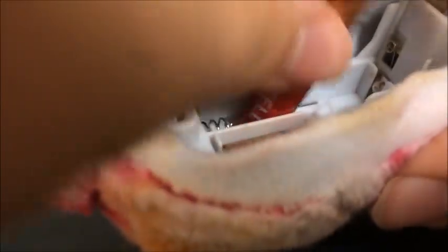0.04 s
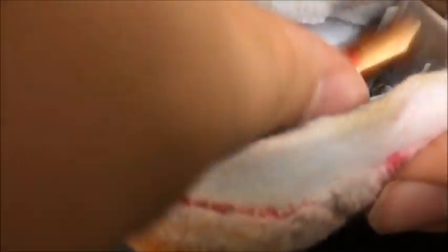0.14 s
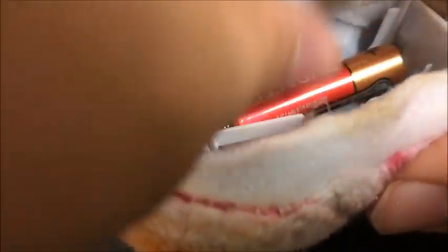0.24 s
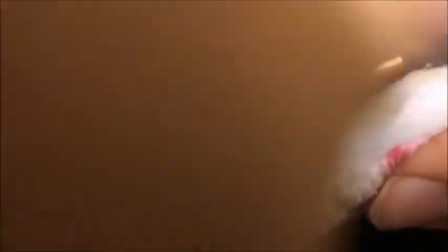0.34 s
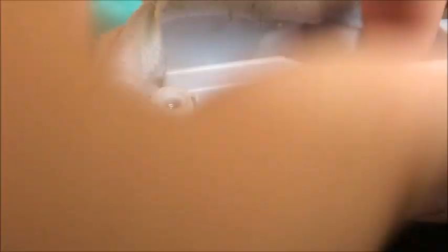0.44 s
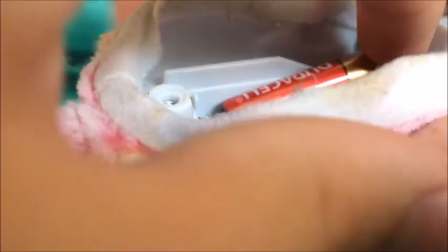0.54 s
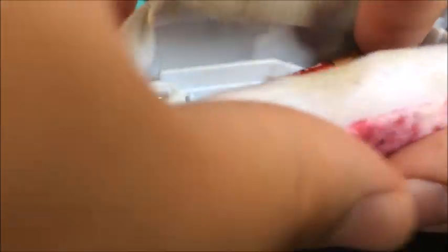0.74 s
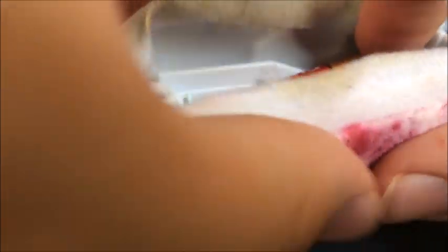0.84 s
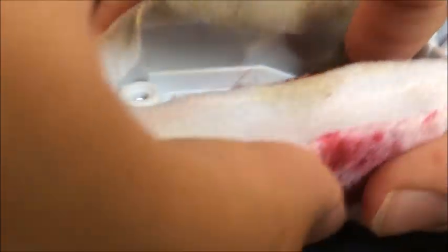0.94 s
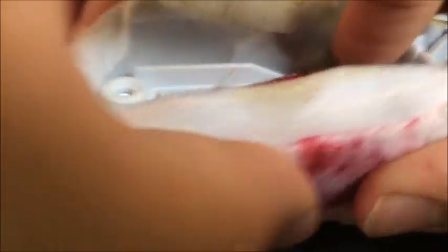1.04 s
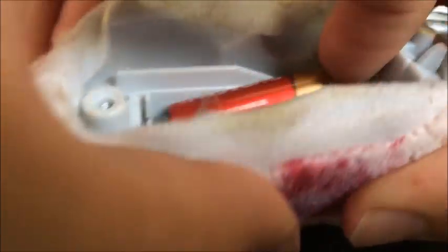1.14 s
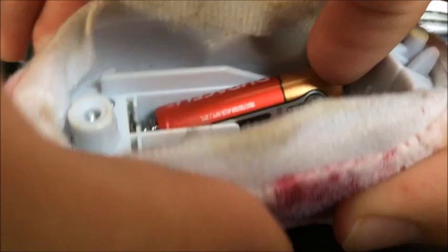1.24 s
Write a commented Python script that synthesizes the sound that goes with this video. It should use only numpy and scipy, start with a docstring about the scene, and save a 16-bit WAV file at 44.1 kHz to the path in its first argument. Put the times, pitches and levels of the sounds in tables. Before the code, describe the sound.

Light, close battery clicks against a soft toy's plastic compartment, with soft finger handling.

```python
"""Light, close ticks: a small battery knocks against the plastic compartment of a soft toy.
It slides over the contact spring, snaps home and rattles in its bay, each hit ringing the damped shell.
Then fingers bump the toy with soft thumps, brush its fabric in a grainy hiss and give one last
bright click with a few faint ticks after it. Underneath lies the low hush of a quiet room."""
import sys
import numpy as np
from scipy import signal
from scipy.fft import rfft, irfft, next_fast_len
from scipy.io import wavfile
from scipy.ndimage import map_coordinates

SR = 44100
rng = np.random.default_rng(int(sys.argv[2]) if len(sys.argv) > 2 else 0)


def output_pcm(signal):
    """Save a mono or channel-first signal as 16-bit PCM at the path in sys.argv[1].

    Samples are clipped to [-1, 1] before scaling.
    """
    pcm = np.clip(np.atleast_2d(signal).T, -1, 1) * 32767
    wavfile.write(sys.argv[1], SR, np.round(pcm).astype(np.int16))


N = 57330


def amp(db):
    """Decibels to gain."""
    return 10 ** (np.asarray(db) / 20)


def unit_rms(x):
    """Scale to rms 1."""
    return x / np.sqrt(np.mean(x ** 2) + 1e-20)


def curve_at(points, hz):
    """Read (frequency, value) points along a log frequency axis."""
    freqs, values = np.transpose(points)
    return np.interp(np.log(hz + 1), np.log(freqs + 1), values)


def equalise(x, gain_at):
    """Zero-phase EQ from a function that gives the gain at each frequency."""
    size = next_fast_len(len(x) + SR // 4)
    return irfft(rfft(x, size) * gain_at(np.fft.rfftfreq(size, 1 / SR)), size)[:len(x)]


def coloured_noise(spectrum):
    """Noise of rms 1, shaped by (frequency, level) points."""
    return unit_rms(equalise(rng.standard_normal(N), lambda hz: amp(curve_at(spectrum, hz))))


def wobble(per_s):
    """A smooth random curve with per_s knots a second."""
    knots = rng.standard_normal(int(N * per_s / SR) + 4)
    return map_coordinates(knots, [np.arange(N) * per_s / SR])


def place(track, start_s, sound):
    """Mix a sound into the track at its cue."""
    part = track[max(0, round(start_s * SR)):][:len(sound)]
    part += sound[:len(part)]


# Tone colour of the quiet room: (frequency [Hz], relative level [dB])
HUSH_SPECTRUM = [(15, -43.5), (30, -27.5), (60, -4), (90, 1.5), (170, 0.5), (280, -11.5), (450, -17.5),
                 (1400, -24), (4250, -28.5), (16000, -32.5)]

def room_hush(level_db=-61):
    """A steady, bass-heavy bed of room tone."""
    return amp(level_db) * coloured_noise(HUSH_SPECTRUM)


# Decay of the room's reflections: (frequency [Hz], t60 [s])
ROOM_DECAY = [(200, .2), (1000, 0.36), (4000, .14), (12000, 0.39)]

def room_reflections(x, wet_db=-27.5, predelay_s=.004):
    """The table and walls answer with a short, weak tail."""
    hz, t, spectrogram = signal.stft(rng.standard_normal(SR // 3), SR, nperseg=256)
    decay = amp(-60 * t / curve_at(ROOM_DECAY, hz)[:, None])
    tail = signal.istft(spectrogram * decay, SR, nperseg=256)[1]
    out = np.zeros(N)
    place(out, predelay_s, signal.fftconvolve(x, tail / np.linalg.norm(tail)))
    return amp(wet_db) * out


# Swells of the handling rumble: (time [s], level [dB])
RUMBLE_ENVELOPE = [(0, -70.5), (.3, -49.5), (.42, -65.5), (.5, -60), (.82, -65.5), (.9, -56.5), (1.0, -59),
                   (1.12, -69), (1.3, -78)]
# Its dark tone colour: (frequency [Hz], relative level [dB])
RUMBLE_COLOUR = [(25, -26), (70, 0), (95, -3.5), (170, 0.5), (260, -12.5), (600, -45.5)]

def handling_rumble():
    """The toy rumbles softly as it shifts in the hand."""
    times, level_db = np.transpose(RUMBLE_ENVELOPE)
    envelope = amp(np.interp(np.arange(N) / SR, times, level_db))
    return envelope * coloured_noise(RUMBLE_COLOUR + [(2000, -120)])


# Strokes of battery, fingers and fabric: (time [s], hiss level [dB], scuff level [dB])
RUB_ENVELOPES = [(0, -59.5, -52.5), (.055, -64.5, -61.5), (.084, -73, -65.5), (0.099, -62, -59),
                 (.16, -59.5, -59.5), (0.227, -66, -86), (.247, -36, -61), (0.266, -55.5, -61),
                 (.31, -43.5, -38.5), (.365, -69, -64.5), (.44, -69, -80), (.485, -58.5, -55),
                 (.52, -70.5, -74), (.562, -69.5, -85), (0.579, -60, -57), (0.599, -80.5, -76),
                 (.765, -66.5, -70.5), (.82, -68.5, -67.5), (0.878, -60.5, -67.5), (.97, -67.5, -64),
                 (1.035, -50.5, -59.5), (1.106, -62.5, -62), (1.134, -49, -65), (1.164, -53.5, -72),
                 (1.2, -58.5, -64.5), (1.25, -54, -64.5), (1.3, -58.5, -68)]
# Bright layer of the friction: (frequency [Hz], relative level [dB])
HISS_SPECTRUM = [(500, -25.5), (1500, -5), (2800, 0.5), (4500, 0.5), (7000, -5), (10000, -10.5),
                 (16000, -23)]
# Dull layer of the friction: (frequency [Hz], relative level [dB])
SCUFF_SPECTRUM = [(100, -15.5), (220, -3), (650, 3.5), (1000, -3), (1900, -8.5), (3500, -20.5), (9000, -44)]

def rubbing(grain_db=2, swell_db=1.5):
    """Grainy friction under uneven finger pressure: a bright hiss over a duller scuff."""
    times, hiss_db, scuff_db = np.transpose(RUB_ENVELOPES)
    t = np.arange(N) / SR
    texture = unit_rms(amp(grain_db * wobble(per_s=500) + swell_db * wobble(per_s=35)))
    hiss = amp(np.interp(t, times, hiss_db)) * coloured_noise(HISS_SPECTRUM)
    scuff = amp(np.interp(t, times, scuff_db)) * coloured_noise(SCUFF_SPECTRUM)
    return texture * (hiss + scuff)


# Soft pushes of the hand: (time [s], pitch [Hz], level [dB], length [s])
HAND_PUSHES = [(.065, 280, -39, 0.01), (0.124, 91, -55, 0.023), (0.151, 225, -47, 0.032),
               (.236, 146, -42, 0.019), (.279, 198, -38, 0.015), (0.281, 90, -49.5, 0.023),
               (0.475, 140.4, -44, .02), (0.492, 93.6, -66, 0.029), (0.576, 70, -43, 0.044),
               (1.033, 87, -42, 0.029)]

def hand_thumps():
    """Each push rocks the toy for a few slow cycles."""
    out, t = np.zeros(N), np.arange(SR // 8) / SR
    for start_s, hz, level_db, length_s in HAND_PUSHES:
        arch = np.sin(np.pi * np.minimum(t / length_s, 1))
        place(out, start_s, amp(level_db) * arch * np.sin(2 * np.pi * hz * t))
    return out


# Brief pitched rings: (time [s], pitch [Hz], level [dB], t60 [s])
HIT_RINGS = [(0.1757, 1745, -22, .014), (.178, 962.5, -21, 0.02), (0.2403, 4310, -16.5, 0.012),
             (.2735, 1935, -1, 0.011), (0.2734, 5150, -6.5, 0.0086), (.2818, 591, -19, 0.027),
             (.4705, 862, -44, 0.073), (.574, 1686, -63, 0.22), (.6902, 631, -30, 0.018),
             (1.0263, 5270, -18, 0.0092)]

def hit_rings(attack_s=.0005):
    """Fast-decaying sines: the strongest tones of the loudest clicks, plus a few lone pings."""
    out, t = np.zeros(N), np.arange(SR // 5) / SR
    for start_s, hz, level_db, t60 in HIT_RINGS:
        envelope = amp(level_db - 60 * t / t60) * (1 - np.exp(-t / attack_s))
        place(out, start_s, envelope * np.sin(2 * np.pi * hz * t))
    return out


# Modes of the compartment with its battery: (frequency [Hz], relative level [dB], after-ring t60 [s])
COMPARTMENT_MODES = [(435, -6.5, .12), (625, 3, 0.4), (816, 1.5, .12), (915, -2.5, .15), (1130, -8, .09),
                     (1480, -3, 0.12), (1784, -3.5, .1), (1950, -6, 0.054), (2676, -4, .07),
                     (3155, -7.5, .06), (4360, -5.5, .14), (5350, -7.5, 0.063), (6750, -18.5, .09),
                     (8030, -13, .13)]
# The shell's five bands, from knock up to snap; the slow, low bending waves arrive last:
# (low edge [Hz], high edge [Hz], delay [s], attack [s], hold [s], t60 [s], noise against modes [dB])
SHELL_BANDS = [(260, 1150, .0008, .0009, 0.0007, 0.015, -2.5),
               (1150, 2300, 0.00018, 0.00094, 0.00073, 0.0079, -3),
               (2340, 3600, .0002, 0.00031, 0.0014, 0.0094, -3),
               (3880, 7500, .0001, .0003, 0.00062, 0.014, 4),
               (7900, 16000, 0.000086, 0.00012, .001, .011, 7)]
# Hits of battery on plastic, with a level for each band:
# (time [s], knock [dB], clack [dB], crack [dB], tick [dB], snap [dB])
BATTERY_HITS = [(.0094, -49.5, -47.5, -74.5, -60.5, -81), (.0182, -50.5, -52, -60, -62.5, -78),
                (.0275, -65.5, -53, -73, -77, -80.5), (.0644, -44, -38, -47.5, -41, -51),
                (.0695, -35.5, -45, -64, -54.5, -53), (.131, -48.5, -58, -74, -68, -66),
                (0.1413, -43.5, -54.5, -65.5, -66, -64), (.1763, -33, -43, -46, -43.5, -50),
                (.2077, -45.5, -39, -53, -50, -60.5), (.2105, -34, -42, -52, -54, -68),
                (.2313, -39.5, -34, -50, -41, -49.5), (.2402, -31.5, -26.5, -34, -34, -38.5),
                (.2422, -29.5, -24, -26, -33.5, -34), (.2555, -60, -50, -53.5, -47.5, -49),
                (.2583, -43.5, -33, -51.5, -47.5, -52.5), (.2733, -29.5, -26.5, -15.5, -25.5, -25.5),
                (.2797, -28, -27, -32, -30.5, -30.5), (.2852, -35.5, -27.5, -37, -33, -39),
                (.2905, -36.5, -54, -42.5, -38, -49), (.2941, -34.5, -27, -42.5, -34, -42),
                (.3043, -45, -36.5, -51, -40, -55), (.3165, -53, -45, -57, -48.5, -48),
                (.327, -47, -67, -56, -50, -58), (.3372, -39.5, -46.5, -51, -54, -64),
                (.353, -63, -59, -62, -55.5, -75), (.5272, -69, -60, -64.5, -61, -72),
                (0.5687, -58.5, -67, -73, -70, -65), (.6892, -50.5, -47.5, -58.5, -50.5, -83.5),
                (1.0205, -65, -52.5, -51.5, -50, -60), (1.0262, -55, -45, -46, -34.5, -45.5),
                (1.1255, -57, -70, -57, -47, -77), (1.1503, -60.5, -68, -78, -47.5, -61),
                (1.1672, -72, -72, -73, -49.5, -59)]

def battery_clicks(after_ring_db=-31.5, scatter_db=1.16, detune_share=.014, scatter_rad=.6):
    """Each hit chatters for an instant, rings the damped shell and leaves a faint after-ring."""
    out, t = np.zeros(N), np.arange(SR // 6) / SR
    level_window = .006 * SR  # a band's level is its rms with all its energy packed into 6 ms
    hz, mode_db, after_t60 = np.transpose(COMPARTMENT_MODES)
    after_decay = amp(-60 * t / after_t60[:, None])
    for start_s, *band_levels in BATTERY_HITS:
        # The modes vary a little from hit to hit.
        level_draw, pitch_draw, phase_draw = rng.standard_normal((3, len(hz), 1))
        phase = 2 * np.pi * hz[:, None] * (1 + detune_share * pitch_draw) * t + scatter_rad * phase_draw
        modes = amp(mode_db[:, None] + scatter_db * level_draw) * np.sin(phase)
        for level_db, (low, high, delay, attack, hold, t60, noise_db) in zip(band_levels, SHELL_BANDS):
            in_band = (hz >= low) & (hz < high)
            tone = modes[in_band].sum(0)
            bandpass = signal.butter(3, [low, high], "band", fs=SR, output="sos")
            chatter = unit_rms(signal.sosfilt(bandpass, rng.standard_normal(len(t))))
            decay = amp(-60 * np.maximum(t - hold, 0) / t60)
            impact = decay * (unit_rms(tone) + amp(noise_db) * chatter)
            after_ring = (modes * after_decay)[in_band].sum(0) / (np.std(tone) + 1e-9)
            rise = np.minimum(t / attack, 1)
            click = rise * (impact + amp(after_ring_db) * after_ring)
            gain = amp(level_db) * np.sqrt(level_window / np.sum(click ** 2))
            place(out, start_s + delay, gain * click)
    return out


def scene():
    """A mono mix: clicks with a touch of room, over dry handling noise and room tone."""
    clicks = battery_clicks() + hit_rings()
    reflections = room_reflections(clicks)
    handling = hand_thumps() + rubbing() + handling_rumble()
    return (clicks + reflections + handling + room_hush())[None]


def record(dry):
    """The microphone cuts off steeply above its band limit."""
    top_hz = 15950
    return np.array([equalise(channel, lambda hz: 1 / (1 + (hz / top_hz) ** 120)) for channel in dry])


dry = scene()
out = record(dry)
output_pcm(out)
```